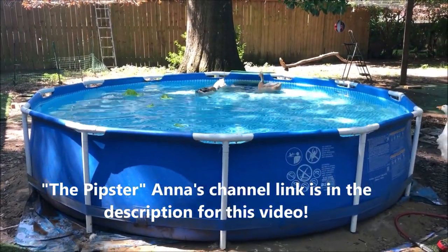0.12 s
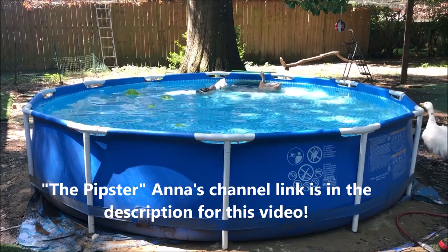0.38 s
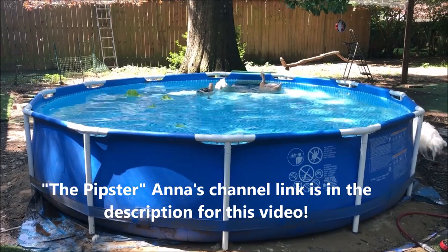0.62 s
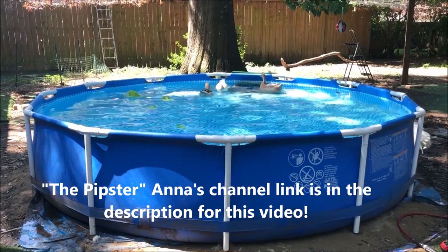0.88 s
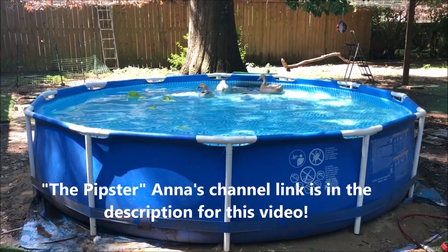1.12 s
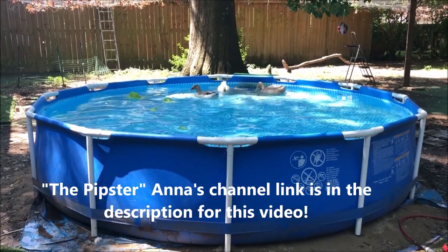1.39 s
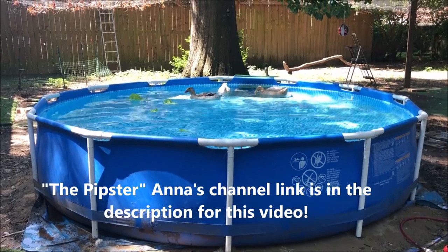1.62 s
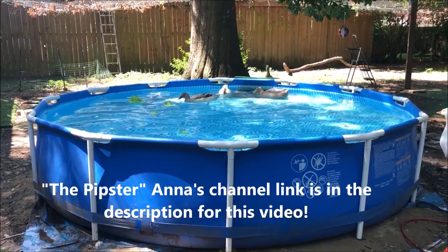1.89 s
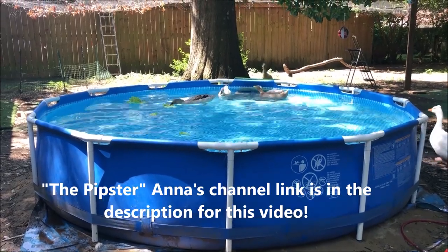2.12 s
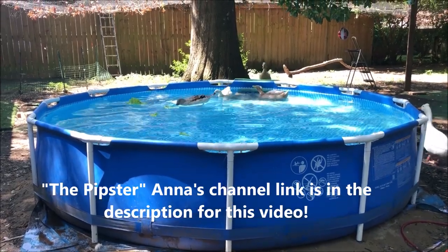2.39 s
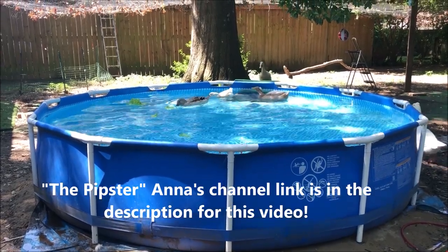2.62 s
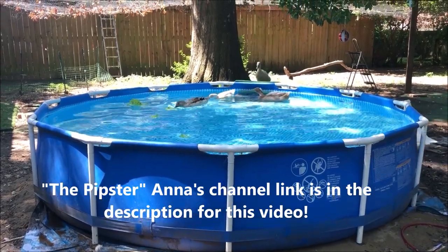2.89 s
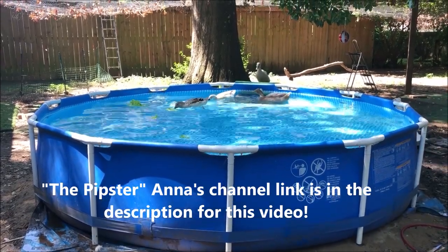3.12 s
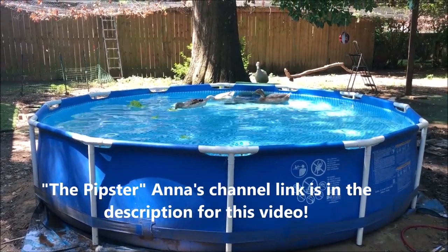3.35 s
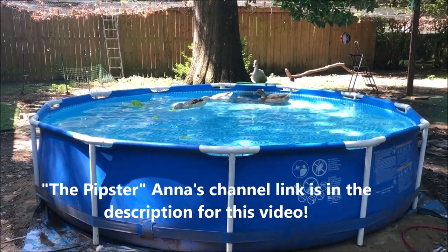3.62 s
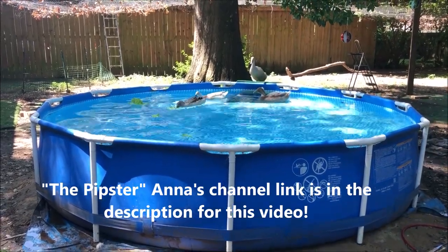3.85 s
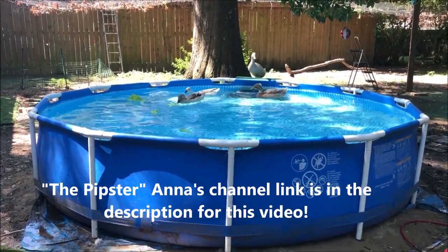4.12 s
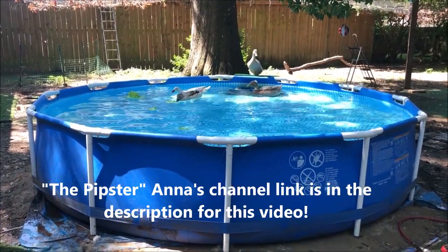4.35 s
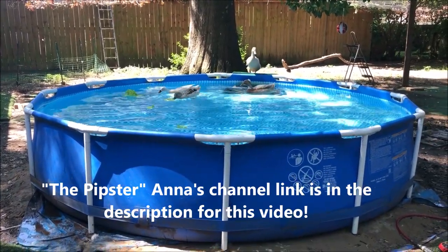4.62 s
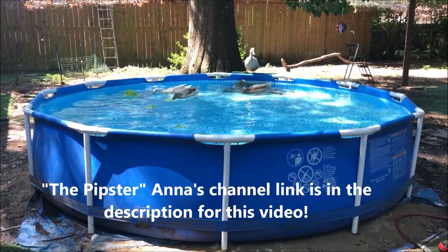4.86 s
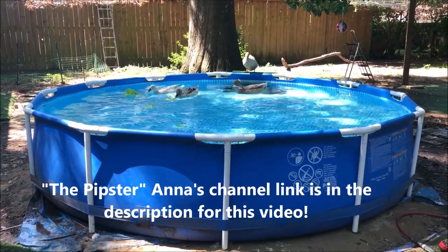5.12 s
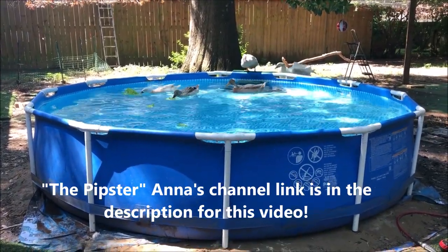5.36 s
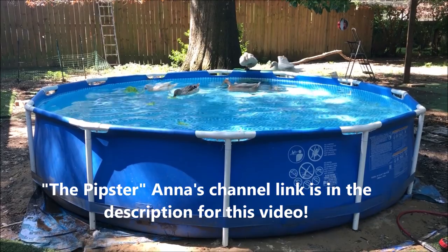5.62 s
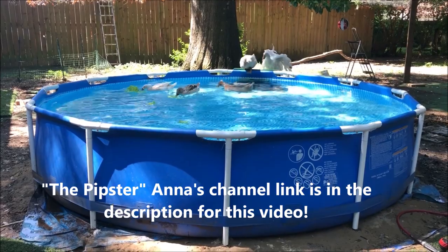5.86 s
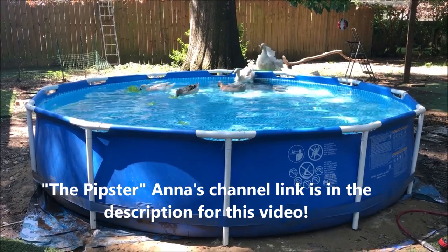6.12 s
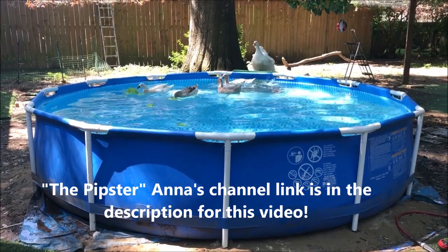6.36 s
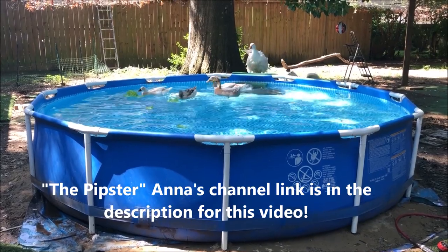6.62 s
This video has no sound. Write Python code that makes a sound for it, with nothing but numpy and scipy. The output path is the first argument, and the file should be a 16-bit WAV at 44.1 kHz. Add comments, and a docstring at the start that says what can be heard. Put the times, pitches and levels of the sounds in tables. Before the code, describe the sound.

An outdoor yard with a faint wash of leaves, water and far traffic, a thin cicada hiss and low pump hum; tiny drips throughout. At 0 s a soft knock, the end of a cry and faint duck mutters; a far crow caws at 0.4 and again from 1.1. Short goose honks with croaky onsets come at 0.9, 1.8, 2.3 and 2.6 s, with dry bill snaps at 1.1, 1.5 and 2.5. From 2.75 to 3.4 raspy low quacks run together with a high goose cry at 2.9. Faint mutters and a falling songbird whistle follow around 3.5-4. Quacks and clear cries overlap from 4.1 to 4.8. A lull holds soft thumps, distant caws and snaps from 4.9 to 5.6. Then the loudest clamour: quacks, cries and honks, with airy wing beats around 6.2, ending on clipped honks at 6.7. Fences echo briefly.

```python
"""Backyard pool: ducks quack and geese croak, honk and cry over each other; fences echo the calls.
Far off a crow caws and a songbird whistles. Voices are jittering overtones and puffed air through a throat.
Bill snaps, knocks at the pool wall, wing beats and drips are decaying noise bursts.
A swelling noise wash makes the yard; two narrow noise bands make the cicadas and the pump."""
import sys
import numpy as np
from scipy import signal
from scipy.fft import rfft, irfft
from scipy.io import wavfile
from scipy.ndimage import uniform_filter1d

SR = 44100
rng = np.random.default_rng(int(sys.argv[2]) if len(sys.argv) > 2 else 0)


def master(y):
    """Save y as 16-bit WAV."""
    cut = np.clip(np.atleast_2d(y).T, -1, 1)
    pcm = np.round(cut * 32767)  # scale
    wavfile.write(sys.argv[1], SR, pcm.astype(np.int16))


def boost(x):
    """Linear amplitude factor 10**(x/20) for a level x in decibels (scalar or array-like)."""
    u = np.asarray(x, float) / 20
    return 10 ** u


N = 297234  # samples


def evened(x):
    """Scales to rms 1."""
    return x / np.sqrt(np.mean(x ** 2) + 1e-20)


def read(points, hz):
    """Straight lines on a log-frequency axis."""
    f, value = np.transpose(points)
    return np.interp(np.log(hz + 1), np.log(f + 1), value)


def add(mix, start_s, sound):
    """Mixes a sound in at start_s."""
    part = mix[round(start_s * SR):][:len(sound)]
    part += sound[:len(part)]


def drift(size, span_s):
    """Twice-smoothed noise of rms 1."""
    width = max(int(span_s * SR), 1)
    smooth = uniform_filter1d(rng.standard_normal(size), width)
    return evened(uniform_filter1d(smooth, width))


def coloured(x, points):
    """Filters x by a spectrum of (Hz, dB) points."""
    gain_db = read(points, np.fft.rfftfreq(len(x), 1 / SR))
    return irfft(rfft(x) * boost(gain_db), len(x))


def burst(t, spectrum, start_db, t60_s):
    """Coloured noise that dies away exponentially."""
    noise = evened(coloured(rng.standard_normal(len(t)), spectrum))
    return boost(start_db - 60 * t / t60_s) * noise


def arch(start_s, length_s, top_hz, top_db, shape):
    """Start, top, end of hold and end of a call as (s, Hz, dB); pitch sags with effort."""
    rise, hold, start_drop_db, end_drop_db, start_flat, end_flat = shape
    rise = np.clip(rise, .05, .85)
    hold = np.clip(hold, rise + .05, .95)
    return [(start_s, top_hz * (1 - start_flat), top_db - start_drop_db),
            (start_s + rise * length_s, top_hz, top_db),
            (start_s + hold * length_s, top_hz, top_db),
            (start_s + length_s, top_hz * (1 - end_flat), top_db - end_drop_db)]


# Air noise, weak under the low overtones. Each row: frequency in Hz, gain in dB.
BREATH = [(1100, -12), (2600, -3)]


def call(rows, throat, jitter, rasp_db, lift_db=0, rattle=0, harsh_db=0, waver=0.33, fray=0):
    """Overtones of a jittering membrane and air puffed each cycle pass the throat."""
    at_s, hz, db = np.transpose(rows)
    t = np.arange(at_s[0], at_s[-1], 1 / SR)
    hz, db = np.interp(t, at_s, hz), np.interp(t, at_s, db)
    slack_db = db.max() - db  # effort below the loudest moment
    turns = np.cumsum(hz * (1 + jitter * drift(len(t), 0.0028))) / SR
    k = np.arange(1, 14000 // hz.max())[:, None]

    # each call holds its bill a little differently
    uneven_db = 2.0 * rng.standard_normal((len(k), 1))
    # high overtones shimmer most
    shimmer_share = np.clip(k * hz.mean() / 2500, waver, 1)
    shimmer_db = 4.17 * shimmer_share * drift((len(k), len(t)), 0.0066)
    # less effort, fewer high overtones
    octaves = np.log2(np.maximum(k * hz / 1200, 1))
    dull_db = (0.061 * slack_db - harsh_db) * octaves
    # the long windpipe smears each pulse
    lag = rng.standard_normal((len(k), 1)) * np.minimum(k * hz.mean() / 1500, 2)
    # the bill opens with effort and lifts the resonances
    gape = 1 - 0.012 * slack_db
    gains = boost(read(throat, k * hz / gape) + uneven_db + lift_db * (k == 2) - dull_db)

    # slow flap in the throat; each flap sweeps up through the overtones
    flap_hz = 65
    flap = flap_hz * t + 0.25 * drift(len(t), 0.03)
    throb = np.exp(rattle * (np.cos(2 * np.pi * (flap - k * hz * 9e-6 * flap_hz)) - .55))
    partials = gains * boost(shimmer_db) * throb * np.cos(2 * np.pi * k * turns + lag)
    tone = partials.sum(0) * np.sqrt(2)

    puffs = (0.87 + np.exp(-(turns % 1) / .5)) * rng.standard_normal(len(t))
    rasp = coloured(coloured(evened(puffs), throat), BREATH)
    rasp = coloured(rasp, [(1200, 0.028), (19200, 4 * harsh_db)]) * np.sqrt(SR / 2 / hz)
    rasp = rasp * boost(fray * slack_db)  # the voice frays into air as effort drops
    rasp = boost(rasp_db) * rasp * throb[len(k) // 8]

    edges = np.clip(np.minimum((t - at_s[0]) / .005, (at_s[-1] - t) / .02), 0, 1)
    level = boost(db) / np.linalg.norm(gains, axis=0)
    return at_s[0], level * (tone + rasp) * edges


# Ducks. Each row: start in seconds, length in seconds, top pitch in Hz, level in dB, harshness in dB per octave.
QUACKS = [(2.753, 0.12, 216.5, -30.5, -2), (2.888, 0.15, 222, -29, -2), (3.131, 0.15, 221.1, -27.5, -1),
          (3.314, 0.13, 219.9, -28, -2), (4.061, 0.12, 222.7, -28.5, -2), (4.239, 0.085, 215.3, -28.5, -4),
          (4.291, 0.09, 230.4, -31, -0.5), (4.47, 0.11, 226.9, -28.5, -1.5), (4.676, 0.15, 223.4, -30.5, 0),
          (5.657, 0.14, 230, -25.5, -1.5), (5.796, 0.12, 230.5, -27.5, 0.5), (5.91, .12, 225.3, -27.5, 1),
          (6.028, 0.12, 229.9, -27, 0), (6.187, 0.08, 209.8, -28.5, -2), (6.23, 0.12, 234.5, -27, -1.5),
          (6.354, 0.054, 222, -32.5, -1), (6.423, 0.13, 231, -27, -0.5)]
# Rise end and hold end as shares of length, start and end drop in dB, start and end flattening as shares of pitch.
QUACK_ARCH = (0.2, 0.5, 6, 12, 0.045, 0.13)
# Duck throat at full effort. Each row: frequency in Hz, gain in dB.
DUCK_THROAT = [(110, -16), (220, -13.5), (440, -27), (670, -4), (900, 8), (1120, 7.5), (1380, -9.5),
               (1850, -4), (2250, -15.5), (3300, -5), (4800, -13.5), (6500, -24), (8800, -33.5),
               (10600, -33.5), (15000, -45.5)]


def quacks():
    """Low rough voice that frays into air as effort drops."""
    out = np.zeros(N)
    for *row, harsh_db in QUACKS:
        add(out, *call(arch(*row, QUACK_ARCH), DUCK_THROAT, jitter=.017, waver=.55,
                       rasp_db=1, fray=.45, harsh_db=harsh_db))
    return out


# Geese, high clear. Each row: start in seconds, length in seconds, top pitch in Hz, level in dB,
# last pitch in Hz, lift of second partial in dB, harshness in dB per octave.
CRIES = [(0, 0.027, 860, -42, 830, -2.5, -9), (2.92, .16, 892, -28, 788, -12.5, -3),
         (4.079, 0.22, 904.6, -32, 908, 8, 3.5), (4.288, 0.175, 968, -28, 914, -3.5, 0.2),
         (4.492, 0.15, 896, -32, 842, -3, -1.5), (5.716, 0.12, 957, -27.5, 910, -2, -4),
         (5.866, .125, 984.5, -27, 887, -5, -1), (6.066, 0.095, 976, -25.5, 854, -6.5, -2.5),
         (6.253, 0.084, 951, -31, 966, -6, -4), (6.509, 0.081, 918, -36.5, 810, 0, 0)]
# Rise end and hold end as shares of length, start and end drop in dB, start flattening as share of pitch.
CRY_ARCH = (0.278, .66, 12.6, 5.6, 0.03)
# Goose throat, wide, at full effort. Each row: frequency in Hz, gain in dB.
GOOSE_WIDE_THROAT = [(350, -23), (600, 10), (900, 7), (1400, 5), (1850, 4.5), (2700, -8), (3700, -1),
                     (4700, -6.5), (6000, -12.5), (8500, -25), (10800, -29.5), (15000, -48)]


def cries():
    """Steady membrane, little air, wide throat."""
    out = np.zeros(N)
    for *row, last_hz, lift_db, harsh_db in CRIES:
        shape = (*CRY_ARCH, 1 - last_hz / row[2])
        add(out, *call(arch(*row, shape), GOOSE_WIDE_THROAT, jitter=.006, rasp_db=-7,
                       lift_db=lift_db, harsh_db=harsh_db))
    return out


# Geese, low. Each row: start in seconds, length in seconds, top pitch in Hz, level in dB,
# last pitch in Hz, harshness in dB per octave.
HONKS = [(0.956, 0.075, 569.2, -32.5, 530, 1), (1.891, 0.048, 524.7, -35, 490, -1),
         (2.282, 0.086, 559.6, -33.5, 517, 2.5), (2.618, 0.1, 579, -31, 526, -1),
         (2.73, 0.07, 592, -34.5, 604, 1.5), (2.997, 0.11, 598, -36.5, 560, 5.5),
         (5.835, 0.12, 702.4, -33.5, 661, 8), (5.972, 0.095, 708.5, -31, 664, 6.5),
         (6.628, 0.086, 623.7, -31.5, 558, 4), (6.71, 0.013, 590, -25.5, 575, 4)]
# Rise end and hold end as shares of length, start and end drop in dB, start flattening as share of pitch.
HONK_ARCH = (0.22, 0.6, 8, 6, 0.02)
# Goose throat at full effort. Each row: frequency in Hz, gain in dB.
GOOSE_THROAT = [(300, -21), (580, -3), (850, 7.5), (1150, 7.5), (1450, 1), (1750, -10), (2250, -12),
                (2750, -21.5), (3300, -11.5), (4000, -12.5), (4900, -24), (6200, -26.5), (15000, -56.5)]


def honks():
    """Membrane locked to a lower pitch than in the cries."""
    out = np.zeros(N)
    for *row, last_hz, harsh_db in HONKS:
        shape = (*HONK_ARCH, 1 - last_hz / row[2])
        add(out, *call(arch(*row, shape), GOOSE_THROAT, jitter=.011, rasp_db=-6, harsh_db=harsh_db))
    return out


# Geese, before honks. Each row: start in seconds, length in seconds, top rate in pulses per second, level in dB.
CROAKS = [(0.914, 0.073, 174, -31.5), (1.828, 0.087, 131, -31.5), (2.263, 0.044, 180, -33.5),
          (2.601, 0.046, 166, -35)]
# Rise end and hold end as shares of length, start and end drop in dB, start and end flattening as shares of rate.
CROAK_ARCH = (0.65, 0.6, 11.4, 6.6, 0.22, 0.018)
# Goose throat, shut, at full effort. Each row: frequency in Hz, gain in dB.
GOOSE_SHUT_THROAT = [(300, -31), (600, 0.5), (900, 6), (1100, 11), (1700, -11), (2400, -16), (3000, -15),
                     (3500, -9), (4000, -15), (4800, -25), (15000, -39.5)]


def croaks():
    """Slow irregular pulses before the voice locks into a honk."""
    out = np.zeros(N)
    for row in CROAKS:
        add(out, *call(arch(*row, CROAK_ARCH), GOOSE_SHUT_THROAT, jitter=.04, rasp_db=-9))
    return out


# Ducks behind the pool. Each row: start in seconds, length in seconds, top pitch in Hz, level in dB,
# harshness in dB per octave.
MUTTERS = [(0, 0.089, 162.4, -44.5, 2.5), (0.136, 0.093, 193, -48, 0.5), (0.312, 0.068, 158.6, -46, -1.5),
           (3.511, .09, 306, -37, -1), (3.669, 0.099, 294, -41, 0.5)]
# Rise end and hold end as shares of length, start and end drop in dB, start and end flattening as shares of pitch.
MUTTER_ARCH = (0.29, 0.61, 0.43, 3.4, 0.04, 0.086)
# Duck throat, bill nearly closed, at full effort. Each row: frequency in Hz, gain in dB.
DUCK_SHUT_THROAT = [(150, -51), (420, -7.5), (620, 0), (780, 8), (1200, 1), (1600, -1.5), (2300, -15),
                    (3350, -7.5), (3750, -10), (4300, -6), (4900, -14), (15000, -59)]


def mutters():
    """Faint duck voice through a nearly closed bill."""
    out = np.zeros(N)
    for *row, harsh_db in MUTTERS:
        add(out, *call(arch(*row, MUTTER_ARCH), DUCK_SHUT_THROAT, jitter=.02, waver=.6,
                       rasp_db=-6, harsh_db=harsh_db))
    return out


# Plastic. Each row: start in seconds, onset level in dB, centre frequency in Hz.
SNAPS = [(1.0679, -43.5, 3200), (1.5493, -54, 8200), (2.4969, -35.5, 1830), (2.565, -34.5, 2800),
         (5.503, -40.5, 2320), (5.5447, -44, 1860)]


def snaps():
    """Bills snap on plastic: dry bursts round one frequency."""
    out, t = np.zeros(N), np.arange(SR // 2) / SR
    for start_s, db, hz in SNAPS:
        add(out, start_s, burst(t, [(hz / 4, -30), (hz, 0), (hz * 4, -20)], db, t60_s=0.031))
    return out


# Pool wall. Each row: start in seconds, level in dB before the rise is applied, rise in seconds,
# t60 in seconds, top frequency in Hz.
THUDS = [(0, -36.5, 0.00067, 0.13, 348), (4.908, -39, 0.0086, 0.37, 1000),
         (5.33, -40.5, 0.0097, 0.056, 606), (5.41, -43.5, 0.012, 0.8, 1260),
         (5.656, -34.5, 0.0054, 0.27, 700)]


def thuds():
    """Soft knocks and splashes at the pool wall: dull bursts with a ramped onset."""
    out, t = np.zeros(N), np.arange(SR // 2) / SR
    for start_s, db, rise_s, t60_s, hz in THUDS:
        spectrum = [(100, -20), (200, 0), (hz, -2), (hz * 3, -28), (16000, -60)]
        add(out, start_s, burst(t, spectrum, db, t60_s) * np.minimum(t / rise_s, 1))
    return out


# Wings. Each row: start in seconds, onset level in dB.
FLAPS = [(6.03, -50), (6.179, -33), (6.197, -29.5), (6.23, -37), (6.355, -37)]
FEATHERS_PER_S = 145  # quills that slip past each other in a beat


def wing_beats():
    """Airy bursts pulsed by slipping quills."""
    out, t = np.zeros(N), np.arange(SR // 2) / SR
    spectrum = [(700, -2), (2500, 10.5), (5000, -6), (7200, 7.5), (9200, -3), (12000, -5), (15000, -14.0)]
    for start_s, db in FLAPS:
        quills = np.exp(-(t * FEATHERS_PER_S % 1) / 0.66)
        add(out, start_s, burst(t, spectrum, db, t60_s=0.13) * quills)
    return out


# Far crow. Each row: start in seconds, length in seconds, top pitch in Hz, level in dB.
CAWS = [(0.442, 0.22, 352.7, -51), (1.072, 0.1, 353.5, -56), (1.289, 0.082, 337, -53.5),
        (5.076, 0.088, 353.5, -50), (5.222, 0.14, 335.7, -51)]
# Rise end and hold end as shares of length, start and end drop in dB, start and end flattening as shares of pitch.
CAW_ARCH = (0.39, 0.855, 3.1, 14, 0.017, 0.021)
# Crow throat at full effort. Each row: frequency in Hz, gain in dB.
CROW_THROAT = [(300, -63), (1050, -13), (1400, -2.5), (1750, -1.5), (2150, -8.5), (2480, -13), (5000, -57)]


def caws():
    """Voice rattled by a slow flap in the throat."""
    out = np.zeros(N)
    for row in CAWS:
        add(out, *call(arch(*row, CAW_ARCH), CROW_THROAT, jitter=.015, rasp_db=-4, waver=1, rattle=.75))
    return out


# Songbird. Each row: start in seconds, length in seconds, top pitch in Hz, level in dB, last pitch in Hz.
WHISTLES = [(0.097, 0.071, 2603, -51, 1960), (1.47, 0.026, 2940, -61, 2820), (5.573, 0.13, 1760, -52, 1770),
            (3.648, 0.026, 3080, -45, 2600), (3.81, 0.12, 2564, -50.5, 1860),
            (4.036, 0.056, 2460, -50, 2460)]
# Rise end and hold end as shares of length, start and end drop in dB, start flattening as share of pitch.
WHISTLE_ARCH = (0.07, 0.54, 16, 7.5, 0)


def whistles():
    """Mostly falling whistles; overtones above 3.2 kHz are cut."""
    out = np.zeros(N)
    for *row, last_hz in WHISTLES:
        shape = (*WHISTLE_ARCH, 1 - last_hz / row[2])
        add(out, *call(arch(*row, shape), [(3200, 0), (3600, -63)], jitter=0.012, rasp_db=-26))
    return out


# Fence echo decay. Each row: frequency in Hz, t60 in seconds.
ECHO = [(500, .25), (1100, .54), (2500, .5), (4300, .6), (5300, .45), (9000, .4)]


def fences(x):
    """Sparse echoes of random sign, each band dying at its own speed."""
    taps = np.zeros(SR)
    at = np.arange(500, SR - 20, 20)
    taps[at + rng.integers(0, 20, len(at))] = rng.choice([-1., 1.], len(at))
    hz, t, z = signal.stft(taps, SR, nperseg=256)
    decay = boost(-60 * t / read(ECHO, hz)[:, None])
    tail = signal.istft(z * decay, SR, nperseg=256)[1]
    return signal.fftconvolve(x, tail / np.linalg.norm(tail))[:N]


DRIPS_PER_S, FAINTEST_DRIP_DB = 6, -52.5


def drips():
    """Drips and pecks at the water: faint ticks, each a puff of noise in its own band."""
    out, t = np.zeros(N), np.arange(1024) / SR
    for at, pitch, size in rng.random((round(DRIPS_PER_S * N / SR), 3)):
        hz = 2200 * 2 ** (1.5 * pitch)
        spectrum = [(hz / 2, -18), (hz, 0), (hz * 2, -18)]
        add(out, at * N / SR, burst(t, spectrum, FAINTEST_DRIP_DB + 6 * size, t60_s=0.021))
    return out


def band(hz, width_hz, db):
    """Noise in one resonance; amplitude halves width_hz off centre."""
    f = np.fft.rfftfreq(N, 1 / SR)
    spectrum = rfft(rng.standard_normal(N)) / (1 + ((f - hz) / width_hz) ** 2)
    return boost(db) * evened(irfft(spectrum, N))


# Wash spectrum. Each row: frequency in Hz, relative level in dB.
YARD = [(25, -27), (50, -5.5), (76, -5), (170, -5.5), (449, -15), (691, -13), (1040, -16), (2090, -25),
        (2890, -24.5), (3880, -27), (7830, -34), (8970, -36.5), (15800, -41)]
YARD_DB = -54.5
# Noise bands. Each: centre in Hz, half-width in Hz, level in dB.
CICADA = (7870, 400, -63.5)
PUMP = (73.7, 3.5, -58.5)


def yard():
    """Leaves, water and far traffic as a slowly swelling wash, with cicadas and a pump."""
    wash = evened(coloured(rng.standard_normal(N), YARD))
    swell_db = 1.5 * drift(N, .2)
    return wash * boost(YARD_DB + swell_db) + band(*CICADA) + band(*PUMP)


def scene():
    """Direct sounds, their fence echo and the yard, alike in both channels."""
    near = quacks() + cries() + honks() + croaks() + snaps() + thuds() + wing_beats()
    behind = mutters()
    far = caws() + whistles()
    echo = fences(boost(-8) * near + boost(-3) * behind + boost(-9) * far)
    mono = near + behind + far + echo + drips() + yard()
    return np.array([mono, mono])


def top_cut(x):
    """Nothing passes above the cut-off."""
    return signal.sosfilt(signal.butter(12, 15830, fs=SR, output="sos"), x)


def record(dry):
    """Delivers the finished mix."""
    return top_cut(dry)


dry = scene()
out = record(dry)
master(out)
```